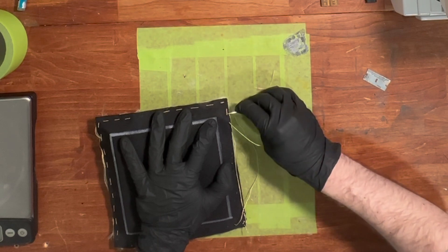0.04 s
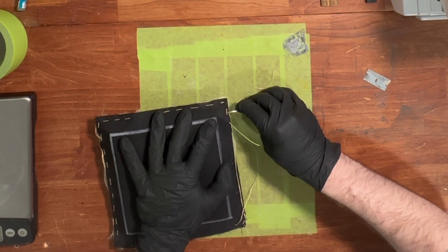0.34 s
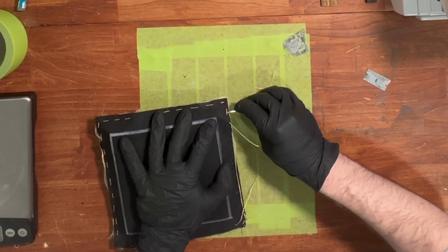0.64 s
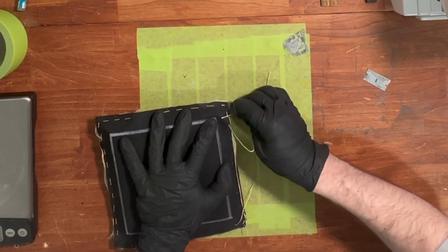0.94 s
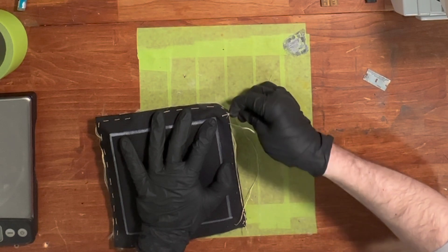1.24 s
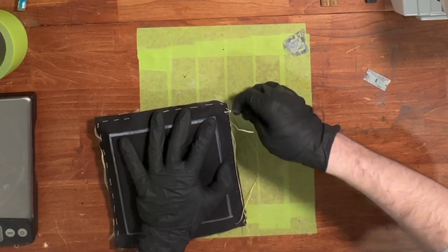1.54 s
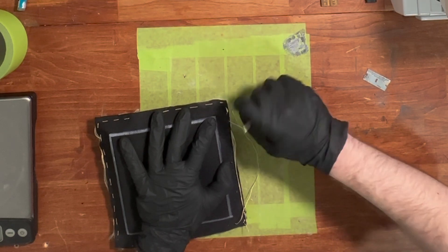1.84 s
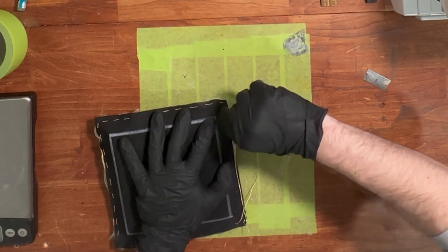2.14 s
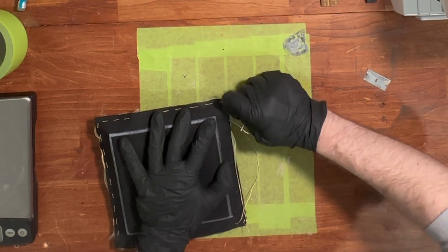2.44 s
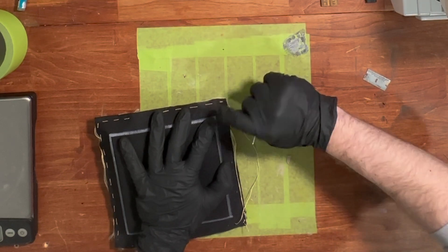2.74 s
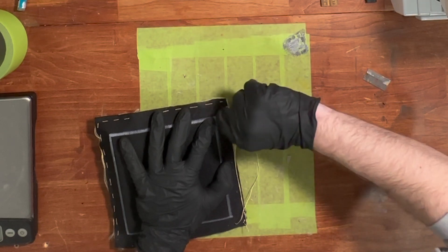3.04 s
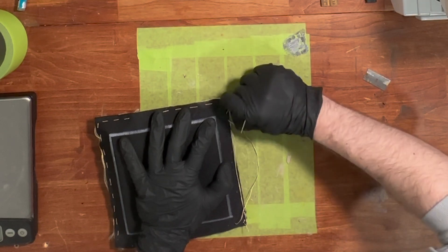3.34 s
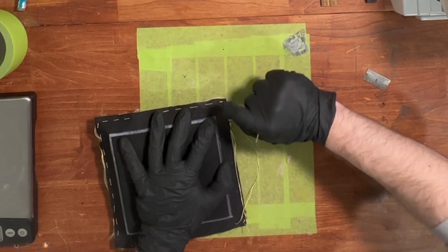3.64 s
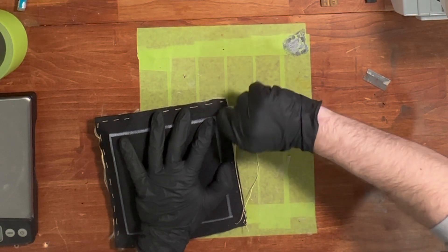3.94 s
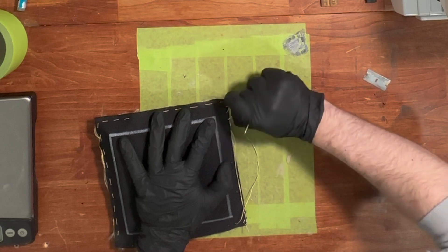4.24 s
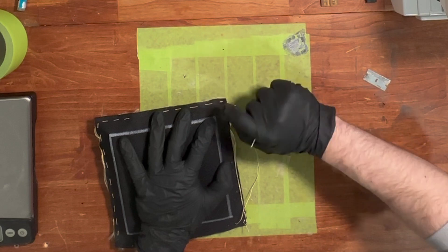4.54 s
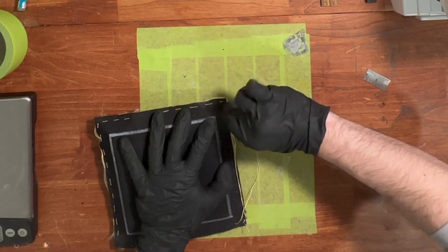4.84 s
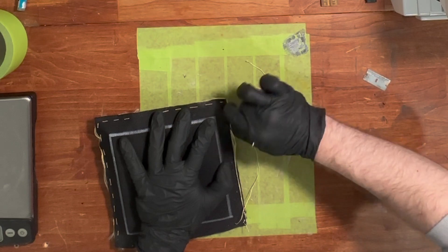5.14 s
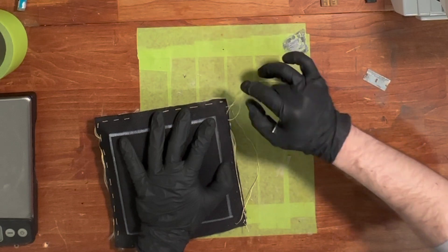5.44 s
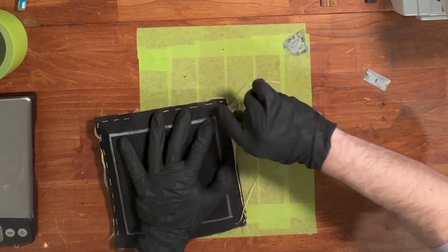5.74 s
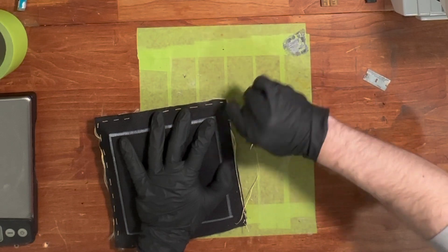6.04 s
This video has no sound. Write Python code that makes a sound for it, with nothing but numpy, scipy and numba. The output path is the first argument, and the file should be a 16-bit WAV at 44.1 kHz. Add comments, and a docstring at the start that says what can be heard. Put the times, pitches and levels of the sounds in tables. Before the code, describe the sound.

A low ventilation rumble with a faint hum runs throughout in a small quiet room. Close by, rubber gloves tick and brush softly over a fabric cover from about 0.6 seconds. At 1.0 and 1.2 seconds taut thread rasps through the cloth and stitches snap, the second sharply, with a slight twang. Faint rustles, ticks and a small pull follow, with tiny rubber squeaks near 1.8 and 2.4 seconds. Short scratchy pulls with little snaps come at 3.3 and 4.2 seconds, each with a soft low thud on the wooden bench. The gloves crinkle and click between 4.4 and 4.9 seconds. A harder tug at about 5.2 seconds brings a quick cluster of snaps and dull bumps. After a few light ticks, the strongest pull rasps, snaps and thuds at around 6 seconds.

```python
"""Rubber gloves tick and rustle over a low ventilation rumble, then thread rasps and snaps out of cloth.
Gloved hands are unpicking a fabric cover on a wooden bench in a small quiet room. The taut thread sticks
and slips through its holes and rings the cover, with a snap and a twang where a stitch gives way.
Hard tugs thud against the bench; between pulls the fingertips brush the weave and squeak on the thread."""
import sys
import numpy as np
from scipy import signal
from scipy.fft import rfft, irfft, next_fast_len
from scipy.io import wavfile
from numba import njit

SR = 44100
rng = np.random.default_rng(int(sys.argv[2]) if len(sys.argv) > 2 else 0)


def inscribe(sig):
    """Save sig as 16-bit PCM at rate SR to the path in sys.argv[1].

    A 1-D sig is mono; a 2-D sig holds one channel per row.
    Samples are clipped to [-1, 1] before scaling.
    """
    pcm = np.round(np.clip(np.atleast_2d(sig).T, -1, 1) * 32767)
    wavfile.write(sys.argv[1], SR, pcm.astype(np.int16))


N = 272758
T = np.arange(N) / SR
PAD = next_fast_len(N + SR // 2)
FREQ = np.arange(PAD // 2 + 1) * SR / PAD

# bright tone of thin glove rubber: (frequency [Hz], gain [dB])
GLOVE_EQ = [(200, -31), (500, -22.5), (1000, -7), (1600, -22), (2400, -5.5), (3200, -7), (4800, -2),
            (6600, 2), (9000, 0.5), (12000, -10.5), (15500, 1)]


def undb(db):
    """Decibels to gain."""
    return 10 ** (np.asarray(db) / 20)


def rms(x):
    """Root mean square."""
    return np.sqrt(np.mean(x ** 2))


def add(track, start, sound):
    """Mix a short sound in at start seconds."""
    i = int(start * SR)
    track[i:i + len(sound)] += sound[:N - i]


def shape(x, response):
    """Filter by a frequency response."""
    return irfft(rfft(x, PAD) * response, PAD)[..., :N]


def colour(points):
    """Minimum-phase EQ curve through (frequency [Hz], gain [dB]) points."""
    hz, db = np.transpose(points)
    gain = undb(np.interp(np.log(FREQ + 1), np.log(hz), db))
    cepstrum = irfft(np.log(gain), PAD)
    cepstrum[1:PAD // 2] *= 2
    cepstrum[PAD // 2 + 1:] = 0
    return np.exp(rfft(cepstrum))


def resonance(hz, width):
    """One damped mode, gain 1 at its centre."""
    return 1j * FREQ * width / (hz ** 2 - FREQ ** 2 + 1j * FREQ * width)


def modes(table, blur=1):
    """Summed response of (frequency [Hz], width [Hz], gain [dB]) modes, each widened by blur."""
    return sum(undb(db) * resonance(hz, width * blur) for hz, width, db in table)


@njit
def swept_resonance(x, hz, width):
    """One damped mode whose centre moves: a state-variable band-pass, gain 1 at the centre."""
    y = np.empty(len(x))
    band_state, low_state = 0., 0.
    for i in range(len(x)):
        tuning, damping = np.tan(np.pi * hz[i] / SR), width / hz[i]
        band = (band_state + tuning * (x[i] + 1e-18 - low_state)) / (1 + tuning * (tuning + damping))
        band_state = 2 * band - band_state
        low_state += 2 * tuning * band
        y[i] = damping * band
    return y


def unit_band(response, low_hz, high_hz):
    """Scale a response so that unit white noise leaves it with rms 1 inside a band."""
    inside = (FREQ > low_hz) & (FREQ < high_hz)
    return response / np.sqrt(np.mean(np.abs(response) ** 2 * inside))


def wander(rate):
    """Smooth random drift with a spread near 1 and rate new values a second."""
    knots = rng.standard_normal(4096)
    return 1.225 * np.interp(T * rate, np.arange(len(knots)), knots)


def grains(rate, scatter_db, size=N):
    """Tiny slips at random moments and of uneven size, about rate a second; rms 1."""
    clicks = (rng.random(size) < rate / SR) * rng.choice([-1, 1], size)
    clicks = clicks * undb(scatter_db * np.clip(rng.standard_normal(size), -2, 2))
    return clicks / rms(clicks)


def burst(t, length):
    """A rounded swell of contact force, length seconds long."""
    return np.sqrt(np.sin(np.pi * np.clip(t / length, 0, 1)).clip(0))


def stroke(peak, length, rise_share=0.32, steepness=1.76):
    """Speed of a sliding finger: it swells to a peak and dies away more slowly."""
    t = T[::64]
    flank = length * np.where(t < peak, rise_share, 1 - rise_share)
    return np.interp(T, t, np.exp(-(np.abs(t - peak) / flank) ** steepness))


def ventilation(air_db=-48, waver_db=2, drift_hz=2):
    """Moving air rumbles and softly hisses, with a faint wavering motor hum."""
    # room tone in the stereo centre and sides: (frequency [Hz], gain [dB])
    mid_eq = [(20, -23.5), (32, -29.5), (48, 3), (65, 0.5), (115, -8), (160, -7.5), (220, -21.5),
              (320, -23.5), (500, -34.5), (900, -45), (2300, -43), (4500, -55), (6600, -46), (15500, -63.5)]
    side_eq = [(30, -37), (60, -40.5), (120, -20), (250, -26), (400, -27.5), (700, -32.5), (1300, -42),
               (2300, -48.5), (4500, -52), (6600, -49), (11000, -100), (15500, -65)]
    # motor hum: (frequency [Hz], level [dB])
    motor_tones = [(120, -59.5), (241, -72)]
    mid, side = (shape(rng.standard_normal(N), colour(eq)) for eq in (mid_eq, side_eq))
    hum = np.zeros(N)
    for hz, db in motor_tones:
        amplitude = np.sqrt(2) * undb(db + waver_db * wander(2.9))
        pitch = hz + drift_hz * wander(6.8)
        hum += amplitude * np.sin(2 * np.pi * np.cumsum(pitch) / SR)
    return undb(air_db) * np.array([mid + side, mid - side]) / rms(mid) + hum


def crease_ticks(ring_db=4, trim_db=-3, attack_s=0.0006, decay_s=0.0014, faint_count=12):
    """Each crease lets go with a short crack and a brief ring; fainter ones come at random."""
    # glove creases and fibres flick: (time [s], level [dB], ring [Hz])
    flicks = [(0.2616, -47, 6600), (0.886, -50, 2440), (0.919, -60, 3430), (0.964, -47, 2270),
              (1.1446, -43, 2440), (1.5164, -52, 7970), (1.581, -45, 2380), (1.613, -38, 4400),
              (1.824, -40, 6100), (2.2452, -46, 4080), (2.338, -56, 6500), (2.385, -56, 6000),
              (2.458, -41.5, 8500), (2.708, -42.5, 4030), (2.75, -51.5, 7000), (3.122, -45.5, 6430),
              (3.155, -45.5, 5500), (3.2796, -38.5, 5760), (3.8461, -38, 2080), (3.859, -46, 2500),
              (4.4753, -47.5, 5900), (4.6267, -41.5, 3660), (4.6498, -43, 6760), (4.668, -54, 4000),
              (4.811, -47, 6700), (4.8351, -33.5, 7100), (4.8972, -34, 3240), (4.931, -46, 4430),
              (5.012, -54, 7850), (5.3606, -36, 2820), (5.453, -47, 3500), (5.5972, -44, 3900)]
    faint = [(rng.uniform(0, T[-1]), rng.normal(-59, 2), rng.uniform(2000, 4500))
             for _ in range(faint_count)]
    out, t = np.zeros(N), T[:1024]
    envelope = np.exp(-t / decay_s) * np.minimum(t / attack_s, 1)
    for start, db, hz in flicks + faint:
        crack = rng.standard_normal(len(t)) * envelope
        ring = signal.lfilter(*signal.iirpeak(hz, Q=4, fs=SR), crack)
        tick = crack / rms(crack) + undb(ring_db) * ring / rms(ring)
        add(out, start, undb(db + trim_db) * tick / np.abs(tick).max())
    return shape(out, colour(GLOVE_EQ))


def glove_rustle(trim_db=-3.5, scrape_db=-4, patchy_db=2.5):
    """Thin rubber brushes the weave in a fine crackle; the cover scrapes when it presses harder."""
    # a glove slides over the cloth: (peak time [s], level [dB], length [s], send to the cover [dB])
    slides = [(0.672, -61, 0.088, -2.5), (0.754, -63, 0.065, -2.5), (0.844, -74, 0.13, 4),
              (0.988, -66, 0.18, 3.5), (1.126, -65.5, 0.03, -3), (1.544, -62.5, 0.16, -20),
              (1.608, -61.5, 0.17, -2), (1.751, -58, 0.078, -30), (1.837, -63.5, 0.11, -3),
              (2.086, -61, 0.021, -14), (2.276, -73.5, 0.56, -7), (2.532, -67, 0.019, -30),
              (2.678, -67, 0.19, -5.5), (3.152, -74, 0.12, 6), (3.493, -61.5, 0.11, -5.5),
              (3.846, -65, 0.069, -2), (4.398, -64.5, 0.12, 1), (4.632, -63, 0.14, -12),
              (4.838, -58, 0.14, -12), (5.364, -71.5, 0.1, 9.5)]
    # the cover under a sliding finger: (frequency [Hz], width [Hz], gain [dB])
    scrape_modes = [(2210, 1000, 2), (3970, 1340, -1)]
    brush, press = np.zeros((2, N))
    for peak, db, length, send_db in slides:
        drag = undb(db + trim_db) * stroke(peak, length)
        brush += drag
        press += drag * undb(send_db + scrape_db)
    crackle = grains(rate=1500, scatter_db=-1.5) * undb(patchy_db * wander(60))
    rubber = unit_band(colour(GLOVE_EQ), 5500, 11000)
    cover = unit_band(modes(scrape_modes), 1800, 3600)
    return shape(crackle * brush, rubber) + shape(crackle * press, cover)


def fingertip_rubs(trim_db=-3):
    """A fingertip shifts its grip: gritty slips ring one resonance of the glove or the cover."""
    # shifts of grip: (peak time [s], level [dB], length [s], ring [Hz])
    shifts = [(.675, -70, 0.15, 2320), (.77, -68, 0.055, 3450), (.92, -78, 0.14, 2270),
              (.88, -68, 0.35, 6200), (2.19, -66.5, 0.068, 3450), (2.78, -71.5, 0.17, 510),
              (2.96, -70, 0.059, 597), (3.175, -68, 0.03, 950), (3.504, -64, 0.024, 1080),
              (4.39, -68.5, 0.044, 955), (4.635, -65, 0.081, 3620), (4.65, -66.5, 0.057, 2740),
              (4.79, -74, 0.054, 2630), (4.834, -56.5, 0.013, 2100), (5.39, -67, 0.024, 7550),
              (5.56, -70.5, 0.076, 635), (5.69, -70.5, 0.047, 3840), (5.955, -67.5, .03, 3300)]
    grit = grains(rate=1500, scatter_db=2.5)
    out = np.zeros(N)
    for peak, db, length, hz in shifts:
        mode = signal.iirpeak(hz, Q=2.4, fs=SR)
        ring = signal.lfilter(*mode, signal.lfilter(*mode, grit))
        out += undb(db + trim_db) * stroke(peak, length) * ring / rms(ring)
    return out


def thread_slips(ring_hz, rate, scatter_db, ring_db=1):
    """A run of tiny slips, coloured by the ring of the free length of thread; rms 1."""
    grit = grains(rate, scatter_db, size=SR // 4)
    ring = signal.lfilter(*signal.iirpeak(ring_hz, Q=3, fs=SR), grit)
    rasp = grit + undb(ring_db) * ring
    return rasp / rms(rasp)


def thread_pulls(trim_db=-4, tug_db=6, catch_db=2.5, slacken_s=0.042):
    """Taut thread sticks and slips: its friction on the weave and its tug on the whole cover."""
    # thread runs through cloth: (time [s], level [dB], rise [s], hold [s], low body [dB], ring [Hz])
    pulls = [(0.829, -68, 0.044, 0.07, 3, 2290), (1.015, -52.5, 0.0078, 0.0063, 11, 1350),
             (1.161, -54, 0.023, .003, -2, 1400), (1.225, -50.5, 0.0072, 0.002, 11.5, 1170),
             (1.567, -59, 0.027, 0.011, -19, 2320), (2.416, -62.5, 0.0099, 0.008, 5, 1240),
             (2.589, -68, 0.025, 0.027, 2, 1110), (3.245, -58.5, 0.069, .004, -21, 1010),
             (3.279, -48, 0.014, 0.016, 2, 1250), (3.832, -60, 0.01, 0.0078, -3, 2100),
             (4.07, -60, .04, .004, 9, 1410), (4.196, -47, 0.011, 0.0066, 1, 1380),
             (5.112, -49, 0.015, 0.004, 7, 1480), (5.16, -40.5, 0.0084, 0.021, 4.5, 2270),
             (5.352, -66.5, 0.0078, 0.008, 14, 950), (5.992, -38.5, 0.044, 0.026, -4, 1430),
             (6.044, -41, 0.019, 0.017, 4.5, 2400), (6.1, -40.5, 0.0057, 0.0069, 0.5, 2000)]
    friction, tug = np.zeros((2, N))
    t = T[:SR // 4]
    for start, db, rise, hold, body_db, ring_hz in pulls:
        tension = np.interp(t, np.cumsum([0, rise, hold, slacken_s]), [0, 1, 1, 0])
        drag = undb(db + trim_db) * tension * thread_slips(ring_hz, rate=3000, scatter_db=2.5)
        add(friction, start, drag)
        add(tug, start, drag * undb(body_db + tug_db))
    friction *= undb(catch_db * wander(220))  # the twist of the thread catches in the weave
    return friction, tug


def cover_ring(friction, tug, drive_db=2, bench_db=12, crossover_hz=600, waver_share=0.016):
    """The thread rings the cover, whose modes waver slightly at random: close sound and reverb send."""
    # resonances of the cover and the taut thread: (frequency [Hz], width [Hz], gain [dB])
    cover_modes = [(256, 36, -1.5), (497, 51, 8), (700, 46, -3), (840, 90, -8), (933, 81, 13.5),
                   (1050, 69, -0.5), (1245, 190, 11.5), (1387, 43, -5), (2170, 360, 6), (2316, 115, 3),
                   (3086, 110, 2), (4110, 310, -2.5)]
    # bare scratch of the fibres: (frequency [Hz], gain [dB])
    fibre_eq = [(100, -72), (300, 3), (650, -16.5), (1150, -11), (1750, -18), (3000, -35.5), (5000, -5),
                (7500, -10), (10000, -10), (12000, -53), (15500, -2.5)]
    lowpass = 1 / (1 + (FREQ / crossover_hz) ** 4)
    drive = undb(drive_db) * (friction + shape(tug - friction, lowpass))  # tug lows, friction highs
    scratch = shape(drive, colour(fibre_eq))
    bench = shape(tug, undb(bench_db) * resonance(hz=121, width=84) ** 2 * lowpass)
    ring = np.zeros(N)
    for hz, width, db in cover_modes:
        centre = hz * (1 + waver_share * wander(40))
        ring += undb(db) * swept_resonance(drive, centre, float(width))
    blurred_ring = shape(drive, modes(cover_modes, blur=3.5))
    return scratch + bench + ring, scratch + bench + blurred_ring


def stitch_snaps(trim_db=-4, twang_hz=235, decay_s=0.02, db_per_octave=-7):
    """A stitch gives way with a snap, and the released thread twangs like a damped string."""
    # stitches letting go: (time [s], level [dB], length [s], twang level [dB], ring [Hz])
    stitches = [(1.0246, -38.5, 0.0084, -50, 1360), (1.053, -48, 0.0097, -57, 2500),
                (1.2318, -30, 0.00906, -36, 2320), (1.245, -48, 0.012, -60, 2300),
                (1.259, -50, 0.01, -58, 1300), (1.609, -43.5, 0.0032, -57, 2400),
                (1.7, -59, .003, -77, 1200), (3.28, -43.5, 0.004, -67, 1250),
                (3.294, -41, 0.0057, -50.5, 2370), (3.315, -49, 0.006, -52, 4300),
                (3.332, -47, 0.0051, -54, 1250), (4.159, -38, 0.0068, -48.5, 1270),
                (4.167, -40.5, 0.0031, -75, 1210), (4.19, -44.5, 0.0057, -69, 1240),
                (4.213, -51, 0.006, -73, 4300), (4.25, -70, 0.0063, -65, 1260),
                (5.129, -48, 0.0059, -62, 2370), (5.148, -39.5, 0.0078, -49, 2300),
                (5.179, -30.5, 0.0075, -53, 980), (5.185, -41, 0.0052, -56, 1200),
                (5.213, -39.5, 0.013, -54, 2400), (6.0496, -29, 0.0046, -42, 2230),
                (6.081, -41.5, 0.008, -46, 2400)]
    snaps, twangs = np.zeros((2, N))
    t = T[:SR // 4]
    harmonics = sum(undb(db_per_octave * np.log2(k)) * np.sin(2 * np.pi * k * twang_hz * t)
                    for k in range(1, 7))
    pluck = harmonics * np.exp(-t / decay_s)
    for start, db, length, twang_db, ring_hz in stitches:
        rasp = thread_slips(ring_hz, rate=5300, scatter_db=-3)
        add(snaps, start, undb(db + trim_db) * burst(t, length) ** 2 * rasp)
        add(twangs, start + length / 2, undb(twang_db) * pluck)
    return snaps, twangs


def rubber_squeaks(jitter=0.12, patchy_db=2):
    """Rubber slips on the thread almost periodically: a rough little chirp."""
    # fingertip squeaks: (time [s], level [dB], length [s], pitch [Hz], glide [octaves/s])
    chirps = [(1.825, -47, 0.0038, 2430, 17), (2.435, -45.5, 0.01, 1364, -24),
              (2.446, -54, 0.0245, 1200, -16)]
    out, t = np.zeros(N), T[:4096]
    wobble = 1 + jitter * wander(1500)
    grip = undb(patchy_db * wander(400))
    for start, db, length, hz, glide in chirps:
        now = slice(int(start * SR), int(start * SR) + len(t))
        pitch = hz * wobble[now] * 2 ** (glide * np.minimum(t, length))
        tone = np.sin(2 * np.pi * np.cumsum(pitch) / SR)
        add(out, start, undb(db) * grip[now] * burst(t, length) * tone)
    return out


def bench_thuds(rise_s=0.017):
    """The bench answers a hard tug with a soft low thud that swells and dies away."""
    # the cover rocks against the bench: (time [s], level [dB], pitch [Hz])
    bumps = [(3.294, -42, 108.7), (4.16, -47, 104), (5.175, -39.5, 86.4), (5.216, -37, 115),
             (6.005, -46, 117), (6.055, -37, 101.4), (6.11, -36.5, 111.3)]
    out, t = np.zeros(N), T[:SR // 4]
    swell = t / rise_s * np.exp(1 - t / rise_s)
    for start, db, hz in bumps:
        add(out, start, undb(db) * swell * np.sin(2 * np.pi * hz * t))
    return out


def room(close, send, early_db=-6, late_db=-12, early_t60=0.13, late_t60=0.33, damp_hz=7000):
    """Close sound with quick reflections off the bench; the send returns as a duller wall tail."""
    # stereo width of the reflections: (frequency [Hz], side relative to mid [dB])
    width_eq = [(110, -12), (350, -9.5), (650, 7), (1200, -4.5), (2400, -3.5), (4400, 1.5), (8000, -4),
                (12000, -36)]
    t = T[:SR // 2]
    early, late = rng.standard_normal((2, 2, len(t))) * (t > .001)  # 1 ms pre-delay
    early = early * undb(-60 * t / early_t60)
    late = late * undb(-60 * t / late_t60) * np.minimum(t / 0.012, 1)
    early, late = (rfft(h / np.sqrt(np.sum(h ** 2) / 2), PAD) for h in (early, late))
    off_bench = undb(early_db) * early * rfft(close, PAD)
    off_walls = undb(late_db) * late * rfft(send, PAD) / (1 + 1j * FREQ / damp_hz)
    mid, side = off_bench + off_walls
    side = side * colour(width_eq)
    return close + irfft(np.array([mid + side, mid - side]), PAD)[:, :N]


def scene(snap_body_db=-3):
    """The handwork in its room, over the ventilation."""
    hands = glove_rustle() + fingertip_rubs() + crease_ticks() + rubber_squeaks()
    friction, tug = thread_pulls()
    snaps, twangs = stitch_snaps()
    cover, cover_send = cover_ring(friction + snaps, tug + undb(snap_body_db) * snaps)
    return room(cover + twangs + hands, cover_send + hands) + bench_thuds() + ventilation()


def record(dry, opposed_hz=12400, steepness=2.32, max_half_turns=1.08, top_hz=15800):
    """The highest hiss and clicks spread wide as left and right turn out of phase; the very top is cut."""
    half_turns = np.minimum((FREQ / opposed_hz) ** steepness, max_half_turns)
    turn = np.exp(.5j * np.pi * half_turns)  # left and right turn opposite ways
    channels = shape(dry, np.array([turn, turn.conj()]))
    high_cut = signal.ellip(10, .2, 80, top_hz, fs=SR, output="sos")
    return signal.sosfilt(high_cut, channels)


dry = scene()
out = record(dry)
inscribe(out)
```